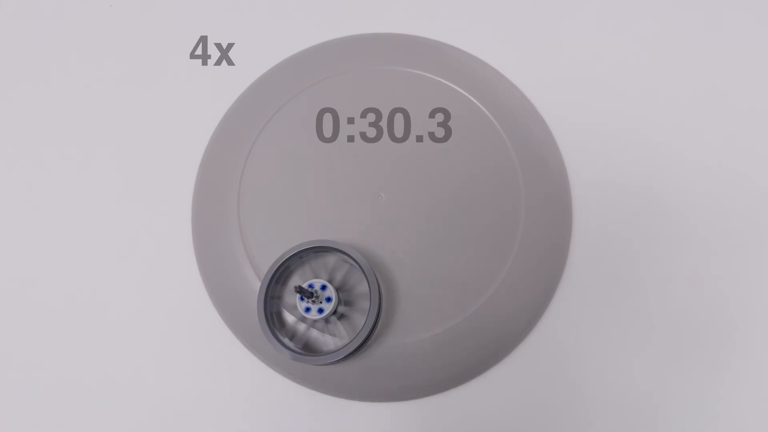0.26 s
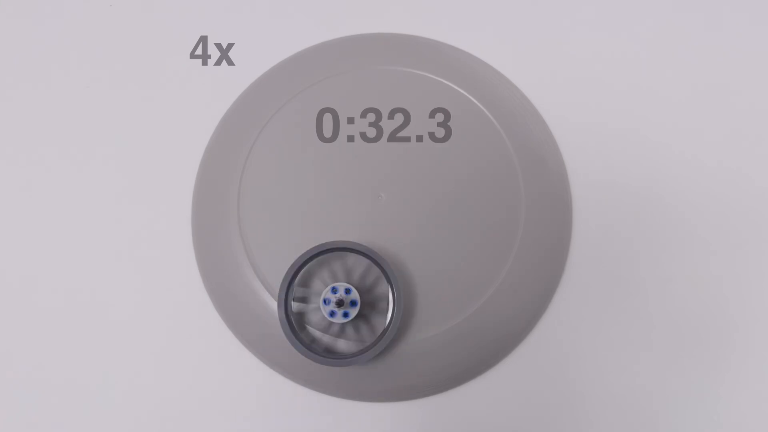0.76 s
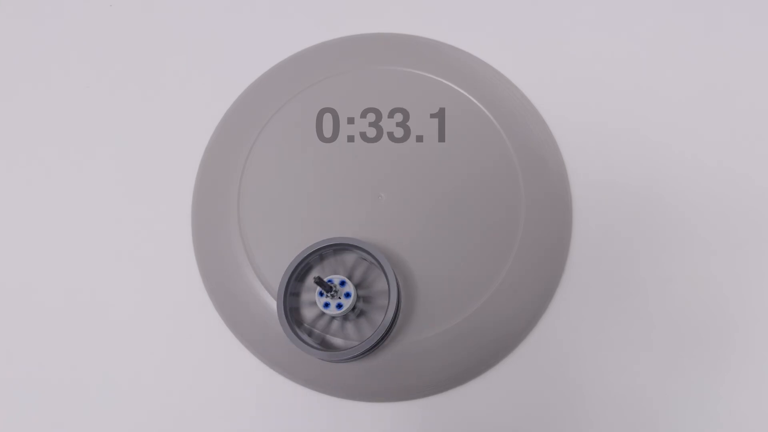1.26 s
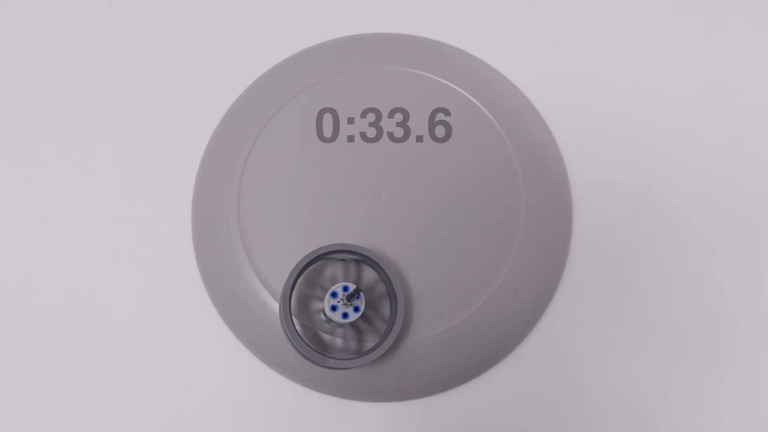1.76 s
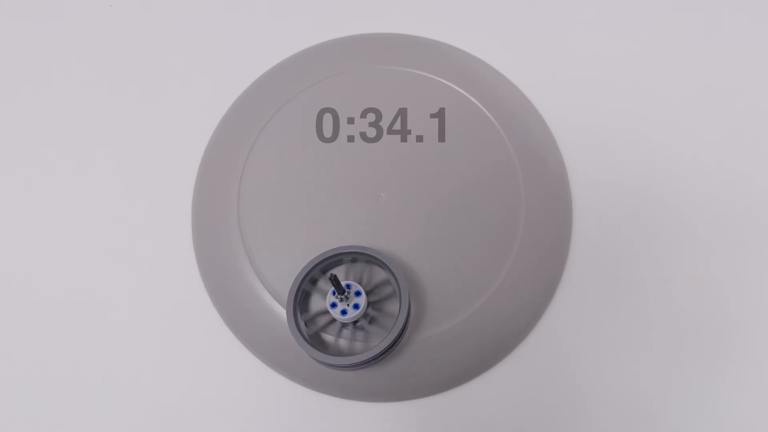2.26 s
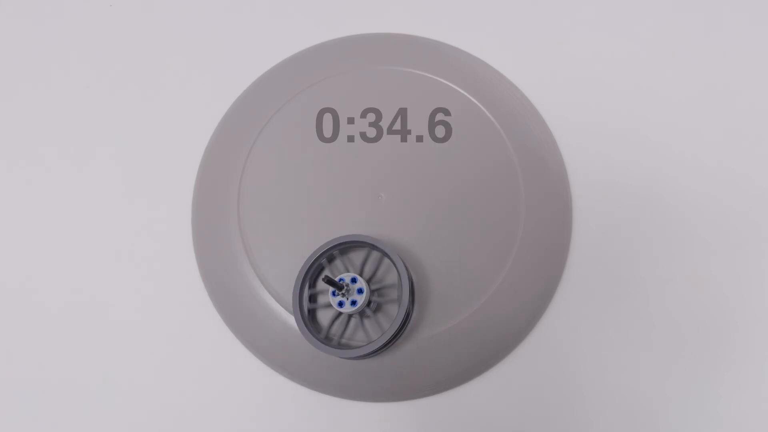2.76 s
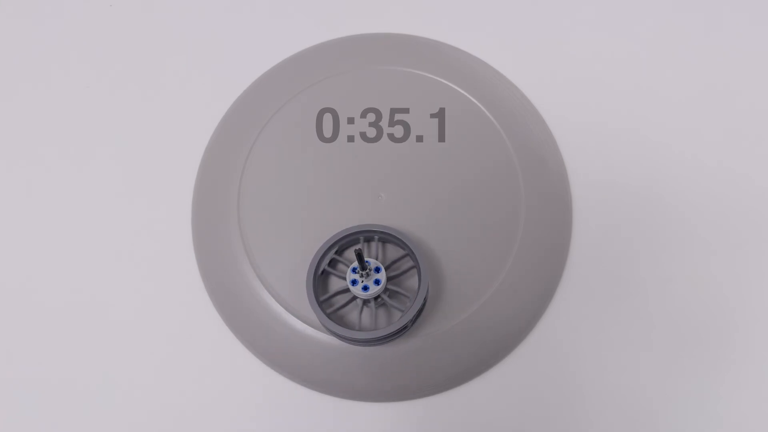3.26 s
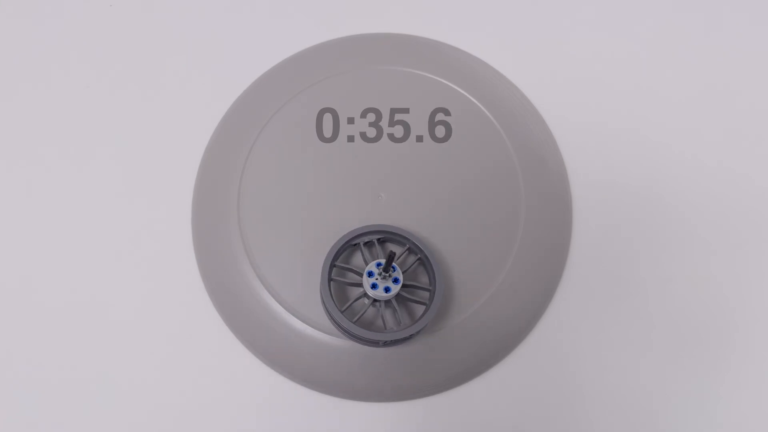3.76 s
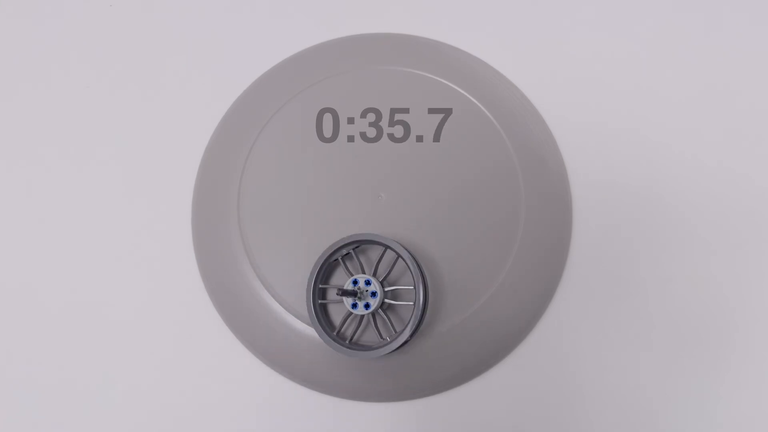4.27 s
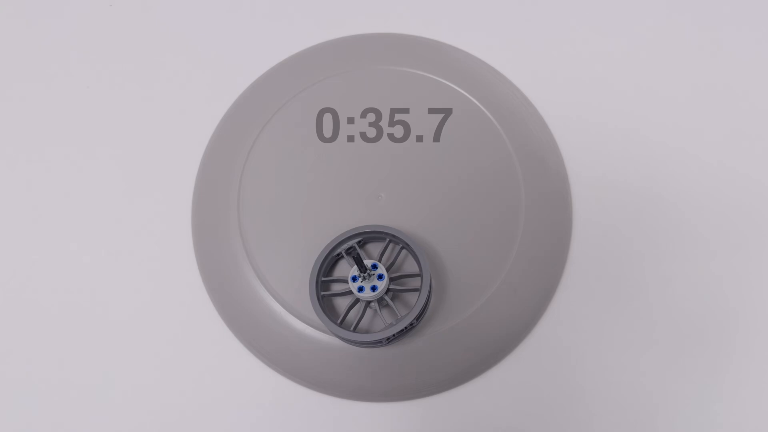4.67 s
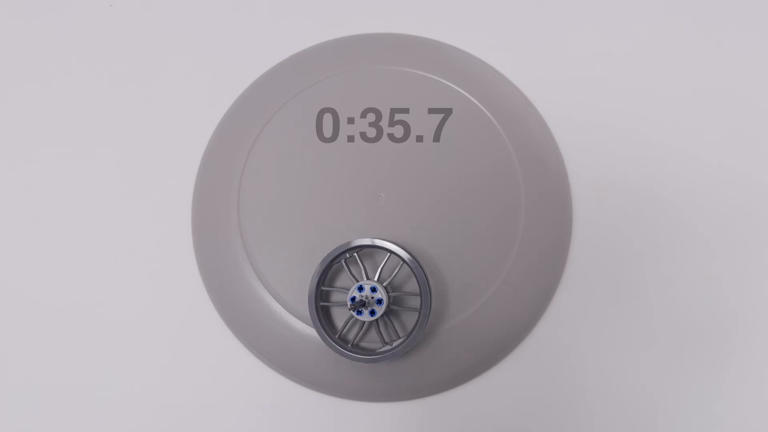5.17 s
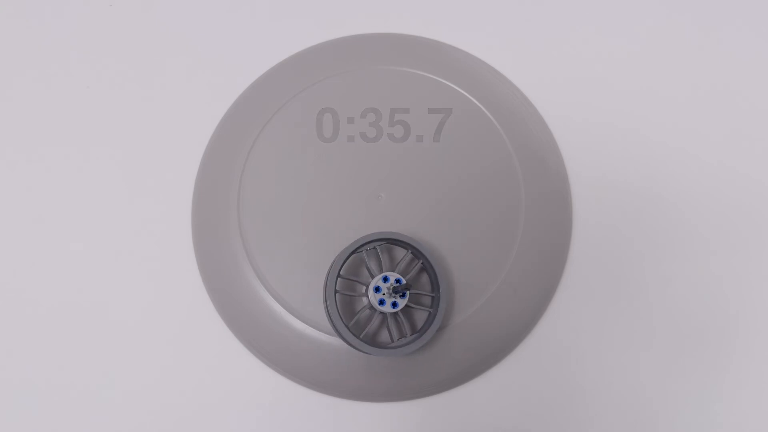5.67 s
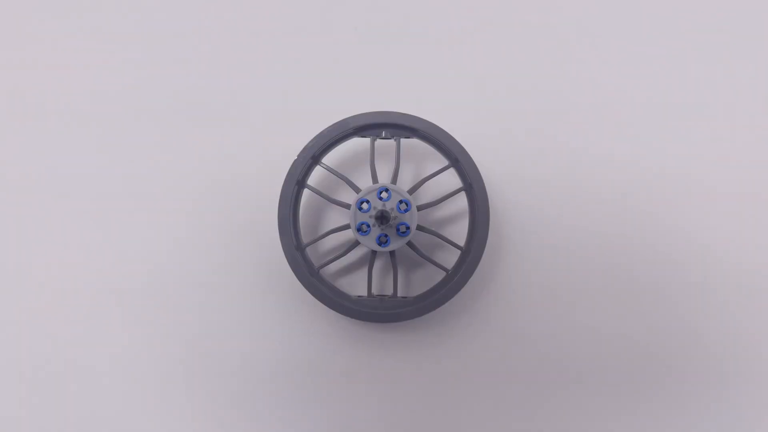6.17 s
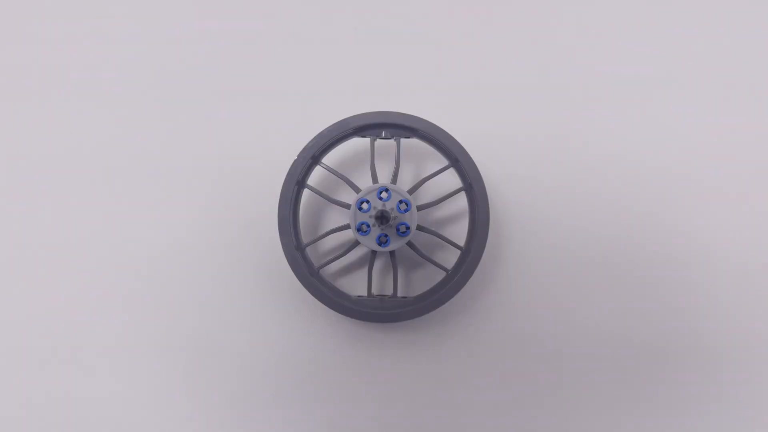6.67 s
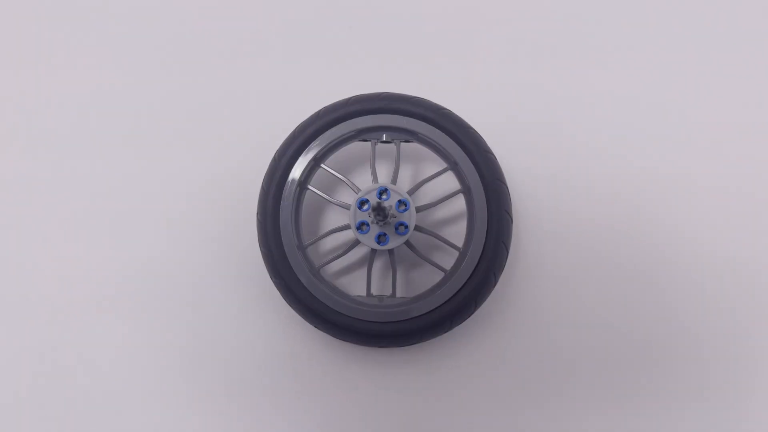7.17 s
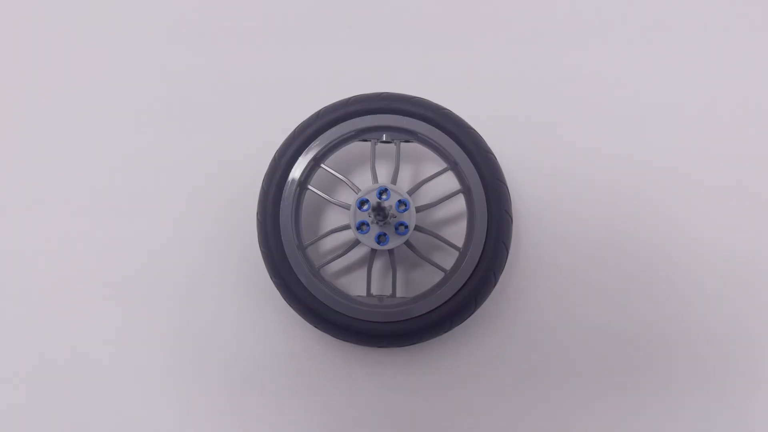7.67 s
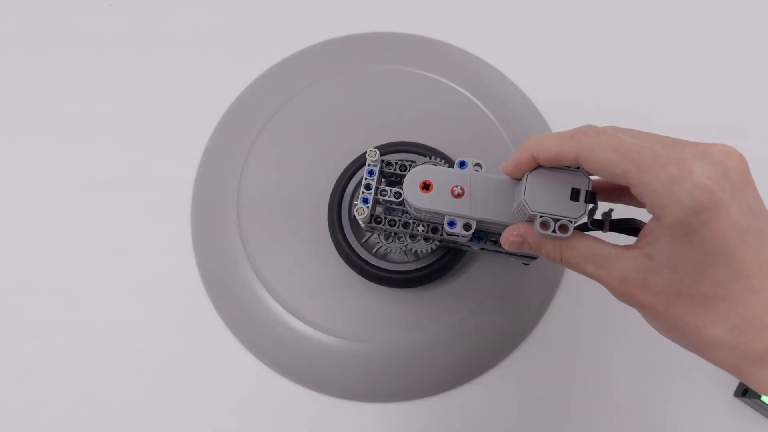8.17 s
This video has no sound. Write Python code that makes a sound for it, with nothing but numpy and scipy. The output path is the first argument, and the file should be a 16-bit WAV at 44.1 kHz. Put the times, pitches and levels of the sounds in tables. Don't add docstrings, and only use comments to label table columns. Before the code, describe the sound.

Close up in a quiet room with faint hum and hiss, a plastic rim crashes onto a dish, clattering quickly before settling into a gritty circling scrape. The scrape decelerates and dies; the wheel then rocks, knocking dully with soft taps between. After an abrupt change to a quieter background come faint cloth movement, a single sharp finger snap, more light rustling, and finally near-silent room tone.

```python
import sys
import numpy as np
from scipy import signal
from scipy.fft import rfft, irfft, next_fast_len
from scipy.io import wavfile
from scipy.ndimage import uniform_filter1d, map_coordinates

SR = 44100
rng = np.random.default_rng(int(sys.argv[2]) if len(sys.argv) > 2 else 0)


def voltage_ratio(decibels):
    exponent = np.asarray(decibels, float) / 20
    return 10 ** exponent


def transcribe(u):
    v = np.clip(np.atleast_2d(u).T, -1, 1)
    q = np.round(v * 32767).astype(np.int16)
    wavfile.write(sys.argv[1], SR, q)


N = 371763
T_S = np.arange(N) / SR

# f/Hz, width/Hz, level/dB
DISH_MODES = [(141, 18, -1.5), (272, 83, -7), (333, 34, -4), (513, 48.4, 1), (579, 99, -7), (732, 34, -8),
              (1005, 86, -6), (1137, 140, -7.5), (1367, 170, -10.5), (1700, 540, -14.5), (2270, 182, -13),
              (2774, 250, -18)]
# f/Hz, width/Hz, level/dB, loudest spoke phase/0-1 (quietest if swing < 0), swing/dB
RIM_MODES = [(3650, 130, -9, 0.04, 4), (3670, 280, -5.5, .5, 0), (4250, 160, -4, 0.7, -1),
             (4640, 69, -8, 0.1, 1.5), (5710, 150, -12.5, 0.1, 5.5), (6474, 88, 3, 0.04, 12),
             (6980, 230, -1.5, 0, -3.5), (7980, 650, -2, 0.1, -1.5), (8160, 310, 1, 0.9, 0),
             (8600, 200, -9.5, 0.7, 8), (9200, 430, -3.5, 0.2, 1.5), (9300, 880, -6, 0.1, 4.5),
             (9840, 200, -6, 0.6, 8.5), (10300, 310, -25.5, 0.92, 10.5), (11470, 91, -13.5, 0.5, 7),
             (12200, 250, -16.5, .1, -1.5), (12800, 200, -18, .3, 6.5), (13500, 250, -15.5, .8, -2),
             (14300, 230, -16, .7, 4.5), (15000, 300, -13.5, .2, 1.5), (15550, 250, -19.5, .5, 2.5)]
# t/s, level/dB
PRESSURE = [
    (1.474, 1),
    (1.55, -8),
    (1.65, -8),
    (1.7, -1.5),
    (1.9, -4),
    (2.05, -1),
    (2.45, -0.5),
    (2.58, -2.5),
    (2.72, 0.5),
]
# landing t/s, peak level/dB, flight/ms (below 0: none), brightness/dB
LANDINGS = [(1.476, -8.5, 3, -8), (1.509, -15.5, -1.5, -26.5), (1.533, -26, 19, -14),
            (1.539, -17, -1.5, -6.5), (1.552, -13.5, 7.5, -5), (1.595, -16, 37.5, -10.5),
            (1.609, -17, 11, -27), (1.614, -19.5, -0.5, -14), (1.637, -19, -4, -13.5), (1.644, -9, 2, -16),
            (1.671, -11.5, 18, -12.5), (1.679, -15.5, -1, -19.5), (1.693, -24, 9.5, -23.5),
            (1.6979, -8, 8, -23), (1.859, -25.5, 10.5, -20), (1.87, -21.5, 7.5, 5.5), (1.898, -26.5, 11, 7),
            (1.92, -25, 8, -6), (2.123, -32, 10, -12.5), (2.175, -30, 6.5, -9), (2.234, -32, 7, -12),
            (2.466, -31.5, 5, -8), (2.627, -10.5, 5.5, -12.5), (2.643, -17, 9, -30), (2.656, -12, 6.5, -24),
            (2.66, -9.5, -1, -20), (3.4, -22, 16.5, -14), (3.598, -22.5, -2.5, -16)]
# t/s, peak level/dB
KNOCKS = [
    (0.859, -35.5),
    (0.8631, -21),
    (1.458, 1),
    (1.469, -4),
    (3.885, -22.5),
    (3.964, 1),
    (4.304, -3),
    (4.904, -28.5),
    (5.0552, -5.5),
    (5.655, -6.5),
]
# f/Hz, level/dB, t60/s
KNOCK_PARTIALS = [(139, -18, 0.015), (207, -5.5, 0.033), (328.6, 7, 0.019), (439, 3, 0.02),
                  (509, -3.5, .07), (645, -18, 0.032), (843, -9, 0.016), (1032, -8.5, 0.043),
                  (1140, 6, 0.018), (1453, -10, 0.037), (1807, -12.5, 0.018), (2236, -15.5, 0.014),
                  (2660, -26.5, 0.014)]
# t/s, peak level/dB
TICKS = [
    (.861, -40),
    (4.416, -44),
    (4.9444, -47),
]
# f/Hz, width/Hz, level/dB
CRADLE_MODES = [(147.5, 25, 7), (269, 77, -3), (380, 180, -7.5), (551, 48.5, -0.5), (1120, 105, 6),
                (1530, 49, -3)]
# peak t/s, level/dB, rise/s, fall/s
ROLLS = [
    (3.7, -38, 0.07, 0.66),
    (3.95, -33.5, .4, 0.13),
    (4.13, -27, 0.13, 0.024),
    (4.4, -35, 0.14, 0.26),
    (4.9, -48, 0.11, .9),
    (5.04, -34, 0.17, 0.11),
    (5.3, -26.5, 0.042, .055),
    (5.8, -40.5, 0.23, 0.93),
]
# t/s, peak level/dB
TAPS = [(4.058, -14), (4.097, -14.5), (4.116, -10.5), (4.128, -16), (4.147, -12.5), (4.186, -27),
        (4.448, -37), (4.963, -40), (4.979, -25.5), (5.227, -24), (5.268, -18.5), (5.279, -22),
        (5.287, -30), (5.295, -19), (5.308, -16.5), (5.323, -17.5), (5.338, -21), (5.342, -14),
        (5.356, -23), (5.403, -21.5), (5.805, -34)]
# t/s, level/dB, crack level/dB
SNAP = [
    (6.859, -45.5, -14.5),
    (6.8703, 2, -17),
    (6.894, -15, -20.5),
]
# f/Hz, level/dB, t60/s
PALM_PARTIALS = [(1560, -6, 0.0078), (920, -18, .008), (2225, -11, 0.0049), (3300, -16.5, .004),
                 (4150, -17, 0.0048), (5985, -14.5, 0.0039), (7910, -15, 0.0057)]
# peak t/s, level/dB, rise/s, fall/s
RUSTLES = [
    (5.88, -65.5, .01, 0.67),
    (7.0, -59, .025, 0.064),
    (7.128, -58.5, .003, 0.079),
    (7.3, -66, .2, 0.48),
    (7.54, -70.5, .4, 0.403),
    (7.82, -57, .9, .9),
]
# f/Hz, level/dB per Hz
CLOTH = [(240, -37.5), (400, -4.5), (504, 0), (1220, 1.5), (3210, -12.5), (6640, -13.5), (16000, -19.5)]
# f/Hz, level/dB per Hz
HUM = [(20, -34), (40, -21.5), (70, -18), (110, -3.5), (160, 3.5), (250, -4), (350, -8), (500, -38),
       (800, -62)]
# f/Hz, level/dB per Hz
AIR = [(200, -41.5), (400, 2.5), (860, -5), (1190, -2.5), (1550, -8), (1750, -16.5), (2100, -13),
       (2400, -27), (3000, -51.5)]
# f/Hz, level/dB per Hz
HISS = [(1200, -36), (2400, 0), (4100, -2.5), (5400, -6), (9000, -8), (16000, -12)]
# start t/s, room gain/dB, preamp hiss gain/dB
TAKES = [
    (0, -1.5, -6),
    (.858, 2.5, -2),
    (5.873, -8.5, -10.5),
    (7.878, -13, -16.5),
]
# f/Hz, t60/s
WHEEL_ROOM = [(300, 0.2), (1200, 0.17), (4000, 0.076), (12000, 0.056)]
# f/Hz, t60/s
SNAP_ROOM = [(300, .2), (1200, .4), (2000, .2), (4000, .19), (8000, .11), (14000, .06)]

TOPPLE_S, SPIN_S = 1.329, 2.41
SPOKE_HZ, DRAG = 6.35, 3.007
CREEP, SETTLE_DB_PER_S = 0.029, 300
DISH_DB, DISH_BY_SPEED = -24, 0.66
RIM_DB, RIM_BY_SPEED, RIM_BY_PRESSURE, RIM_FADE_DB_PER_S = -27.5, 0.71, -0.17, 5.5
LIFT_DB_PER_MS, LIFT_MAX_DB = 3, 28.5
HOP_DULLS, HOP_MEMORY_S = 0.43, 0.1
FALL_HARD_DB, FALL_BRIGHT_DB, LAND_HARD_DB = -16.5, -25.5, -8.5
ROLL_FLOOR_DB, ROLL_HARD_DB, TAP_HARD_DB = -66.5, -20, -15.5
HUM_DB, AIR_DB, HISS_DB = -45.5, -52, -61


def scrape():
    spent = np.clip((T_S - TOPPLE_S) / SPIN_S, 0, 1)
    speed_db = np.where(T_S > PRESSURE[0][0], 20 * np.log10(1 - spent ** DRAG + CREEP), -200)
    speed_db = speed_db - SETTLE_DB_PER_S * np.clip(T_S - TOPPLE_S - SPIN_S, 0, None)
    press_db, = curves(PRESSURE)
    dish_db = DISH_DB + DISH_BY_SPEED * speed_db + press_db
    rim_db = RIM_DB + RIM_BY_SPEED * speed_db + RIM_BY_PRESSURE * press_db
    rim_db = rim_db - RIM_FADE_DB_PER_S * SPIN_S * spent

    lift_db = np.zeros(N)
    for s, _, flight_ms, _ in LANDINGS:
        if flight_ms > 0:
            airborne = np.clip((T_S - s) / .002 + flight_ms / 2, 0, 1) * (T_S < s)
            lift_db += min(LIFT_DB_PER_MS * flight_ms, LIFT_MAX_DB) * airborne
    rim_db = rim_db - HOP_DULLS * uniform_filter1d(lift_db, size=round(HOP_MEMORY_S * SR))

    chatter = voltage_ratio(.5 * wobble(50) - 7 * np.clip(wobble(300) - .2, 0, None))
    bumps = grains(per_s=1800, spread_db=2.0) + .3 * rng.standard_normal(N)
    slip = voltage_ratio(-lift_db) * unit(chatter * bumps)

    turn = SPOKE_HZ * SPIN_S * (spent - spent ** (DRAG + 1) / (DRAG + 1))
    grit = slip * rng.standard_normal(N)
    rim = voltage_ratio(-9.5) * filtered(grit, lambda hz: highpass(1800)(hz) / (1 + 1j * hz / 5000) ** 2)
    for k, (hz, width, db, phase, swing_db) in enumerate(RIM_MODES):
        side = np.tanh(2.5 * np.cos(2 * np.pi * (turn - phase)) + 0.12)
        seat = voltage_ratio(swing_db * side + 3.6 * wobble(32))
        rim += (-1) ** k * voltage_ratio(db) * resonate(slip * unit(seat), hz, width)

    slowing_db = 0.46 * np.clip(rim_db - dish_db + 5.5, -25, 0)
    dish = np.zeros(N)
    for k, (hz, width, db) in enumerate(DISH_MODES):
        favour = voltage_ratio(1.0 * wobble(17) + slowing_db * (hz > 1500))
        dish += (-1) ** k * voltage_ratio(db) * resonate(slip * favour, hz, width)
    return voltage_ratio(dish_db) * unit(dish) + voltage_ratio(rim_db) * unit(rim)


def knocks():
    dish, crack, t = np.zeros(N + SR), np.zeros(N + SR), np.arange(SR // 5) / SR
    blows = [(s, db, FALL_HARD_DB, FALL_BRIGHT_DB) for s, db in KNOCKS]
    blows += [(s, db, LAND_HARD_DB, bright_db) for s, db, _, bright_db in LANDINGS]
    for s, db, hard_db, bright_db in blows:
        body = ring(KNOCK_PARTIALS[:6], t - .0004, scatter_db=1.95) * (1 - np.exp(-t / 0.0023))
        edge = ring(KNOCK_PARTIALS[6:], t, scatter_db=6.0) * (1 - np.exp(-t / 0.00038))
        add_at(dish, s + .0004, voltage_ratio(db - 3) * (body - voltage_ratio(hard_db + 3.5) * edge))
        add_at(crack, s, voltage_ratio(db + bright_db + 7.5 - 60 * t / .014) * rng.standard_normal(len(t)))
    for s, db in TICKS:
        add_at(crack, s, voltage_ratio(db + 9.5 - 60 * t / 0.0086) * rng.standard_normal(len(t)))
    rim = resonances([mode[:3] for mode in RIM_MODES])
    direct = lambda hz: 0.52 * highpass(700)(hz) / (1 + 1j * hz / 6000)
    return dish[:N] + filtered(crack[:N], lambda hz: rim(hz) + direct(hz))


def rock():
    wheel_take = take() == 1
    resting = wheel_take & (T_S > ROLLS[0][0])
    level = wheel_take * swells(ROLLS) + resting * voltage_ratio(ROLL_FLOOR_DB)
    roll = filtered(grains(per_s=600, spread_db=1.5), lambda hz: 1 / (1 + 1j * hz / 900) ** 2)
    low = unit(filtered(roll, resonances(CRADLE_MODES[:4])))
    high = unit(filtered(roll, resonances(CRADLE_MODES[4:])))
    out, t = np.pad(level * (low + voltage_ratio(ROLL_HARD_DB) * high), (0, SR)), np.arange(SR // 20) / SR
    partials = [(347, 4, 0.037), (199, -18, .03), (510, -4.0, 0.024), (1053, TAP_HARD_DB + 5, 0.032)]
    for s, db in TAPS:
        tap = ring(partials, t, scatter_db=2.0) * (1 - np.exp(-t / 0.00094))
        add_at(out, s, voltage_ratio(db - 4.5) * tap)
    return out[:N]


def snap():
    out, t = np.zeros(N + SR), np.arange(SR // 10) / SR
    opened_s = np.clip(t - .0044, 0, None)
    cavity = voltage_ratio(-60 * t / .08 - 60 * opened_s / .006) * np.sin(2 * np.pi * 1185 * t)
    cavity = cavity * (1 - np.exp(-(t / .0004) ** 2))
    for s, db, crack_db in SNAP:
        crack = voltage_ratio(crack_db - 60 * t / .005) * uniform_filter1d(rng.standard_normal(len(t)), size=2)
        add_at(out, s, -voltage_ratio(db) * (cavity + ring(PALM_PARTIALS, t, scatter_db=4.0) + crack))
    return filtered(out[:N], highpass(300))


def rustle():
    return (take() == 2) * swells(RUSTLES) * voltage_ratio(1.2 * wobble(25)) * noise(CLOTH)


def room():
    _, gain_db, preamp_db = np.array(TAKES)[take()].T
    hum = voltage_ratio(HUM_DB + gain_db + 1.7 * wobble(7.2)) * noise(HUM)
    air = voltage_ratio(AIR_DB + gain_db + 0.42 * wobble(3.5)) * noise(AIR)
    return hum + air + voltage_ratio(HISS_DB + preamp_db) * noise(HISS)


def walls(x, decay):
    hz, t, z = signal.stft(rng.standard_normal(SR // 2), SR, nperseg=256)
    tail = signal.istft(z * voltage_ratio(-60 * t / along(decay, hz)[:, None]), SR, nperseg=256)[1]
    return signal.fftconvolve(np.pad(x, (200, 0)), tail / np.linalg.norm(tail))[:N]


def take():
    return np.searchsorted([row[0] for row in TAKES], T_S, "right") - 1


def swells(rows):
    total = np.zeros(N)
    for s, db, rise_s, fall_s in rows:
        total += voltage_ratio(db - 20 * np.where(T_S < s, (s - T_S) / rise_s, (T_S - s) / fall_s))
    return total


def grains(per_s, spread_db):
    chance, size, sign = rng.random((3, N))
    return unit((chance < per_s / SR) * voltage_ratio(-spread_db * np.log(size + 0.0033)) * np.sign(sign - .5))


def ring(partials, t, scatter_db):
    total = 0
    for hz, db, t60 in partials:
        total = total + voltage_ratio(db + rng.normal(0, scatter_db) - 60 * t / t60) * np.sin(2 * np.pi * hz * t)
    return total


def add_at(out, s, burst):
    out[round(s * SR):][:len(burst)] += burst


def resonate(x, hz, width_hz):
    return signal.lfilter(*signal.iirpeak(hz, hz / width_hz, SR), x)


def resonances(modes):
    def response(f):
        total = 0
        for k, (c, w, db) in enumerate(modes):
            total = total + (-1) ** k * voltage_ratio(db) * 1j * f * w / (c * c - f * f + 1j * f * w)
        return total
    return response


def highpass(corner_hz):
    return lambda hz: (1j * hz / (1j * hz + corner_hz)) ** 3


def filtered(x, response):
    m = next_fast_len(N + SR // 2)
    return irfft(rfft(x, m) * response(np.fft.rfftfreq(m, 1 / SR)), m)[..., :N]


def noise(spectrum):
    return unit(filtered(rng.standard_normal(N), lambda hz: voltage_ratio(along(spectrum, hz))))


def wobble(rate_hz):
    coarse = np.arange(0, N + 64, 32)
    knots = rng.standard_normal(int(N * rate_hz / SR) + 6)
    return np.interp(np.arange(N), coarse, map_coordinates(knots, [coarse * rate_hz / SR]))


def curves(rows):
    s, *cols = np.transpose(rows)
    return [np.interp(T_S, s, c) for c in cols]


def along(points, hz):
    f, v = np.transpose(points)
    return np.interp(np.log(hz + 1), np.log(f + 1), v)


def unit(x):
    return x / np.sqrt(np.mean(x ** 2) + 1e-20)


def scene():
    wheel = filtered(scrape() + rock() + knocks(), highpass(115))
    finger = snap()
    spread = filtered(finger, lambda hz: 1 - 0.55 * resonances([(1185, 200, 0)])(hz))
    echoes = voltage_ratio(-15) * walls(wheel, WHEEL_ROOM) + voltage_ratio(-18.5) * walls(spread, SNAP_ROOM)
    return (wheel + finger + echoes + rustle() + room())[None]


def low_pass(x):
    return signal.sosfilt(signal.butter(12, 17040, fs=SR, output="sos"), x)


def record(dry):
    x = filtered(dry, lambda hz: voltage_ratio(np.interp(hz, [15750, 15900, 16900, 17050], [0, -20, -27, -70])))
    x = x / (1 + np.abs(x / .88) ** 8) ** (1 / 8)
    x = filtered(x, highpass(20))
    return low_pass(x)


dry = scene()
out = record(dry)
transcribe(out)
```